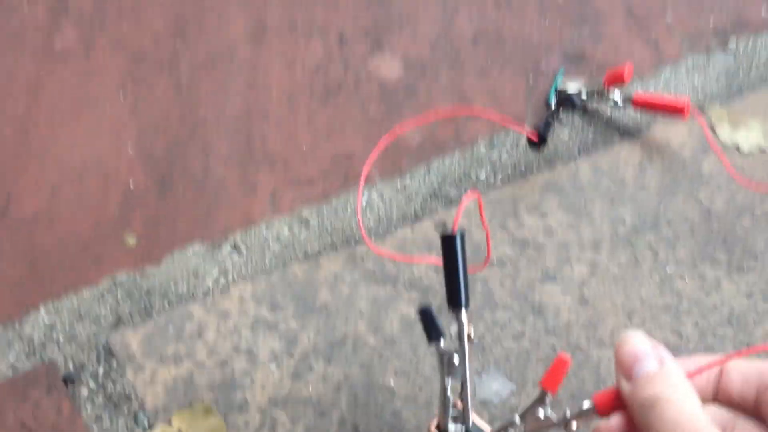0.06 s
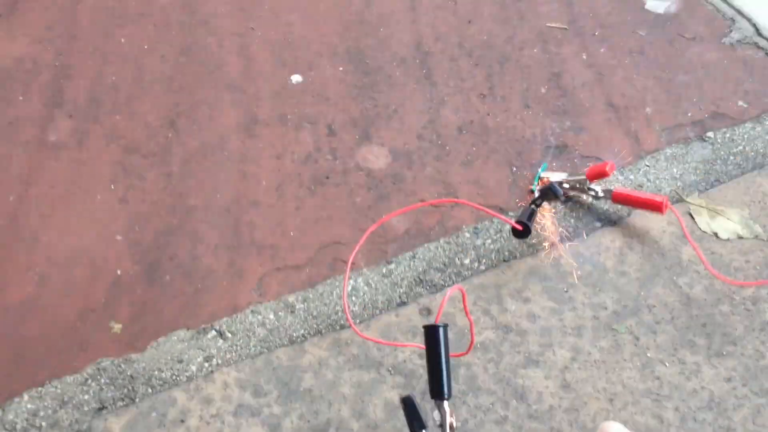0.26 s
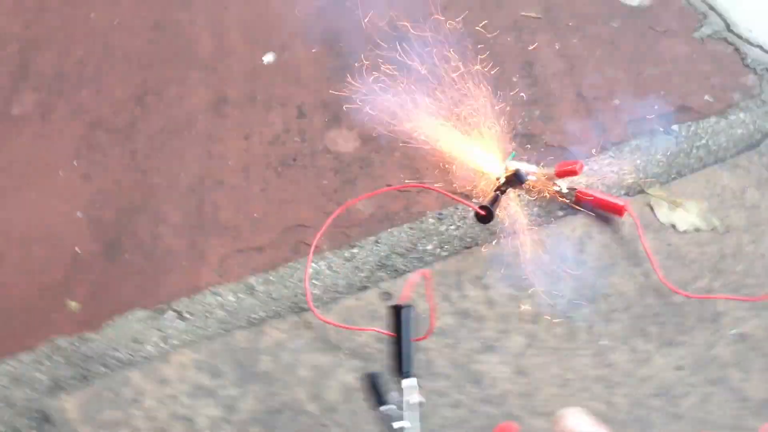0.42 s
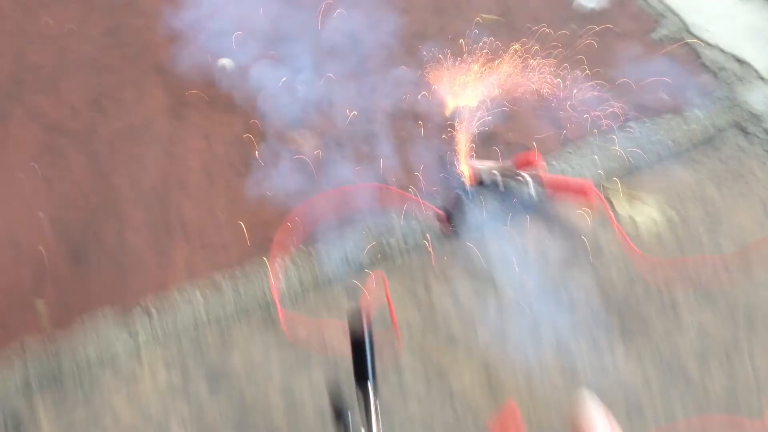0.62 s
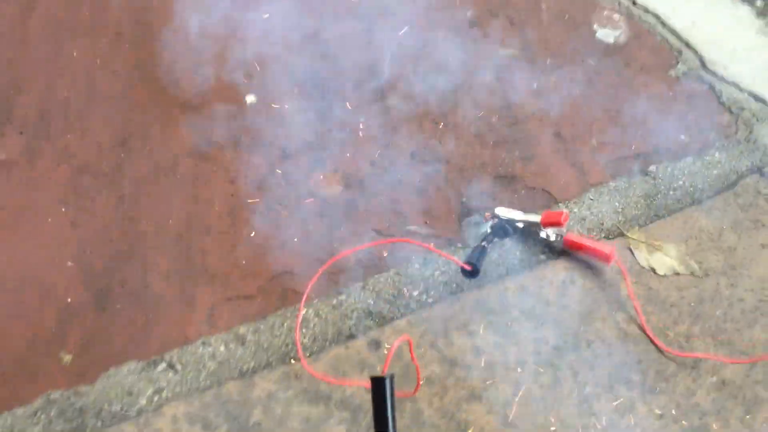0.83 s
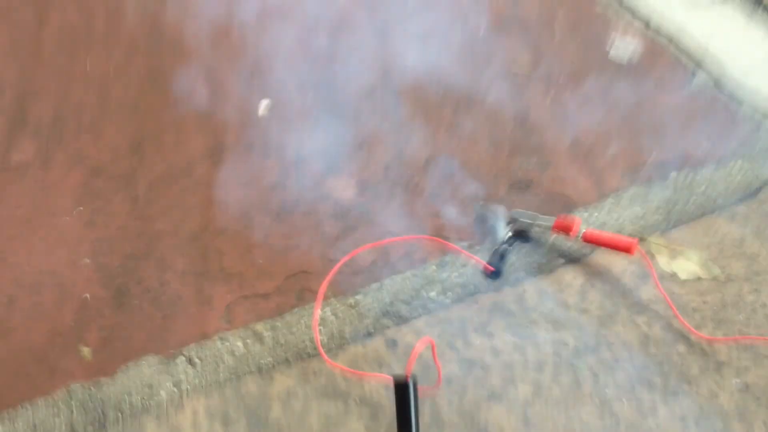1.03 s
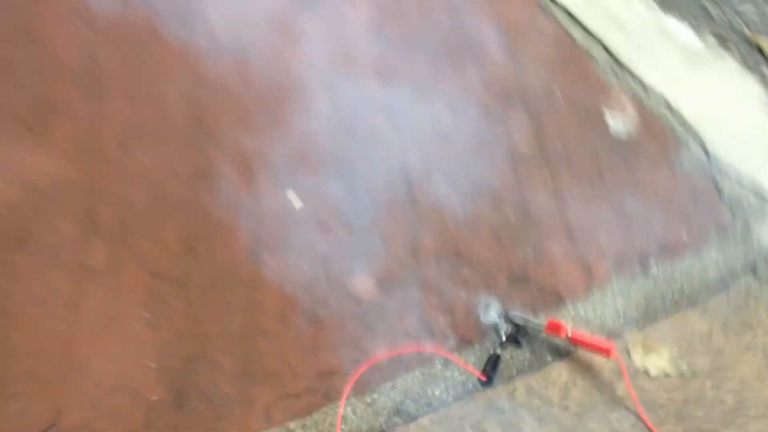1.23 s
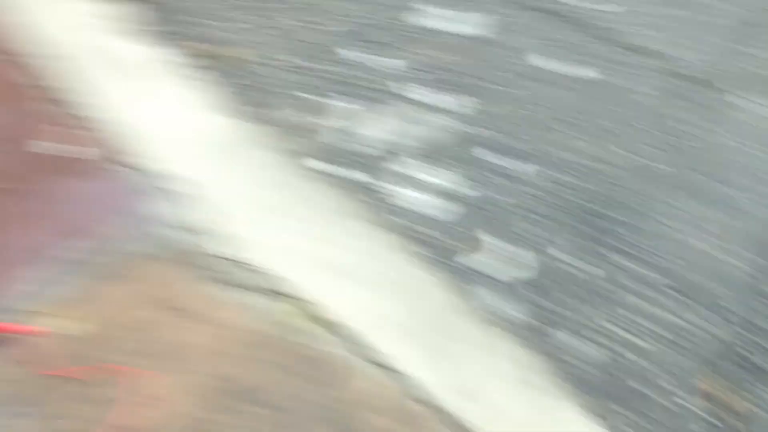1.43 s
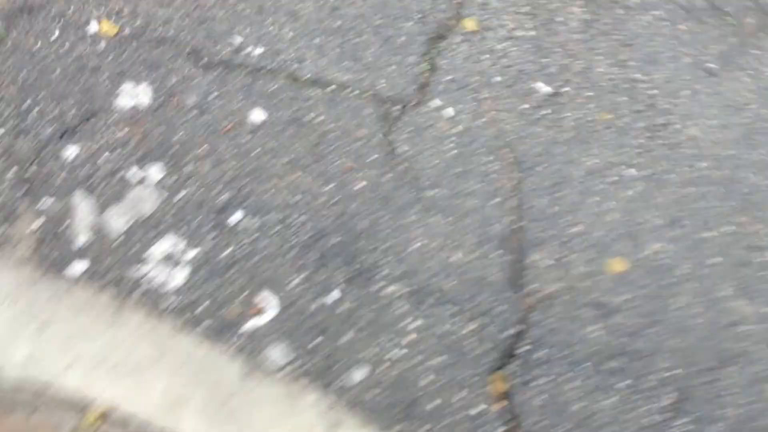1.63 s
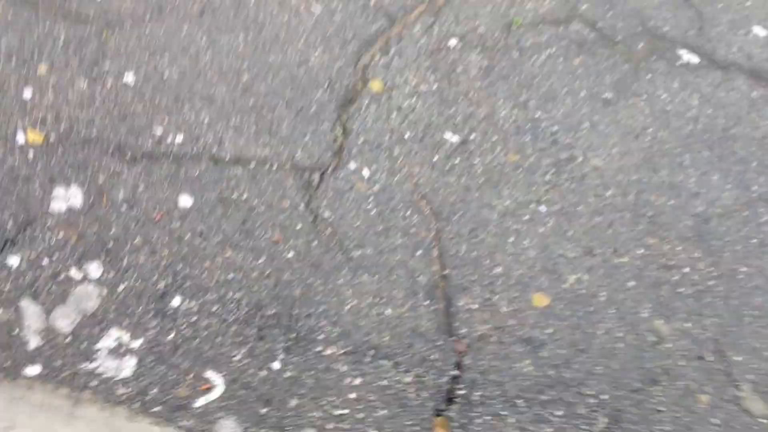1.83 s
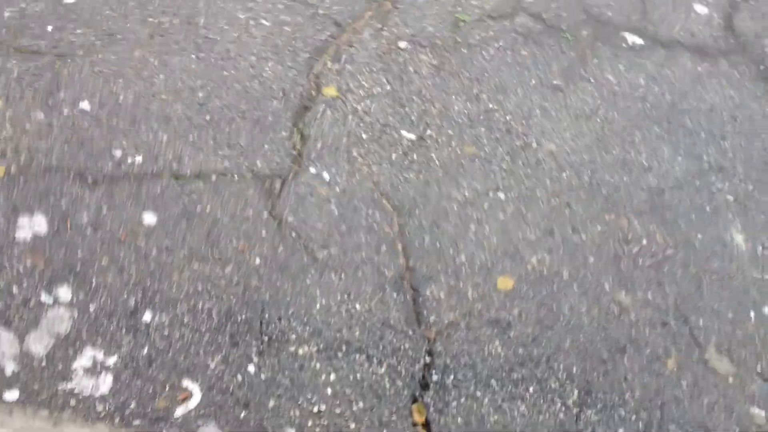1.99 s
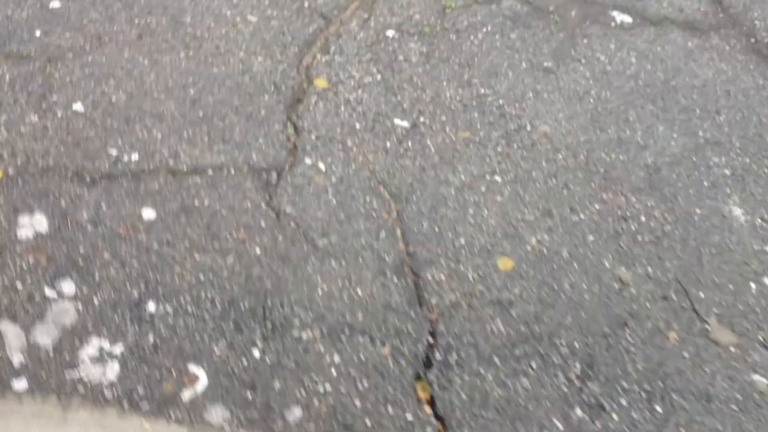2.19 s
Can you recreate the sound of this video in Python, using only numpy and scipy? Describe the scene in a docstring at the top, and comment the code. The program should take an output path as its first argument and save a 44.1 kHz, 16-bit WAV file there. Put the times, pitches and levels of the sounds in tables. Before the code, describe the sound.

A short fuse flares with a hiss, pops sharply and sizzles out outdoors.

```python
"""Over a faint town rumble, a short fuse catches at once, lit electrically on a pavement.
It flares in a fluttering jet of gas and sparks, pops as grains of powder burst, sizzles on more
weakly and goes out. The small microphone close by has a port that rings near 5.7 kHz.
A distant engine hums behind it, and there is one soft bump as the microphone is swung away."""
import sys
import numpy as np
from scipy import signal
from scipy.fft import rfft, irfft
from scipy.io import wavfile
from scipy.ndimage import uniform_filter1d, map_coordinates

SR = 44100
rng = np.random.default_rng(int(sys.argv[2]) if len(sys.argv) > 2 else 0)


def file_out(sig):
    """Save sig as 16-bit WAV at sys.argv[1]."""
    # one column per channel
    cols = np.atleast_2d(sig).T
    # limit, then scale
    lim = np.clip(cols, -1, 1)
    pcm = np.round(lim * 32767).astype(np.int16)
    wavfile.write(sys.argv[1], SR, pcm)


N = 103635
TIME = np.arange(N) / SR

# Fader rides for the burn's bright hiss, treble fizz and low rush.
# Each row: time in seconds, level in dB ahead of the layer's trim.
HISS_RIDE = [(0.216, -33), (0.286, -31), (0.312, -34.5), (0.364, -23), (0.402, -20), (0.408, -22),
             (0.466, -20.5), (0.55, -27), (0.57, -31), (0.58, -30), (0.63, -22), (0.666, -30),
             (0.68, -26.5), (0.75, -27), (0.768, -36.5), (0.81, -29.5), (0.944, -30), (0.988, -39.5),
             (1.04, -35), (1.07, -41.5), (1.16, -40.5), (1.206, -45.5), (1.326, -42.5), (1.336, -34),
             (1.344, -44), (1.504, -32.5), (1.544, -38.5), (1.552, -33.5), (1.58, -41), (1.588, -32),
             (1.602, -39.5), (1.664, -33.5), (1.736, -47), (1.85, -49.5)]
FIZZ_RIDE = [(0.216, -38), (0.274, -36.5), (0.298, -41), (0.392, -25.5), (0.56, -42), (0.628, -39.5),
             (0.658, -45.5), (0.734, -41), (0.796, -46), (0.874, -35.5), (0.992, -53), (1.035, -57),
             (1.085, -49.5), (1.203, -61.5), (1.313, -60), (1.361, -50), (1.505, -51), (1.511, -45.5),
             (1.85, -57)]
RUSH_RIDE = [(0.216, -52.5), (0.32, -51), (0.364, -40), (0.434, -40), (0.456, -35), (0.472, -38.5),
             (0.824, -40), (0.932, -48), (1.04, -49.5), (1.07, -46), (1.188, -51.5), (1.464, -51),
             (1.482, -46.5), (1.578, -55.5), (1.608, -50.5), (1.732, -53.5), (1.85, -71)]
# EQ curves: hiss and fizz have one for the flare and one for the sizzle, the rush keeps one throughout.
# Each row: frequency in Hz, relative level in dB.
FLARE_HISS_EQ = [(1000, -51), (2800, -6), (3500, -23), (4000, -7.5), (4600, -2.5), (5200, 1.5), (5800, 1),
                 (6700, -3), (7600, -0.5), (8400, -5.5), (9500, -38), (12000, -50)]
SIZZLE_HISS_EQ = [(1000, -53), (2600, -32), (3400, -7), (4000, -2.5), (4600, 1), (5300, 1), (6000, 2.5),
                  (7000, -8), (8000, -11), (9200, -12.5), (12000, -45)]
FLARE_FIZZ_EQ = [(3000, -60), (6500, -39), (8300, -16), (9300, -4), (10300, -4.5), (11200, 7), (12400, 7),
                 (13200, 0), (14400, 4), (15500, 2.5)]
SIZZLE_FIZZ_EQ = [(3000, -64), (6500, -14), (8300, -7), (10000, -2.5), (11500, 1.5), (12800, 5.5),
                  (14000, 0.5), (15500, -3)]
RUSH_EQ = [(80, -45), (200, -15), (350, -6), (650, -7.5), (1100, -1.5), (1600, 1), (2100, 4), (2700, -6.5),
           (3300, -11.5), (4500, -19)]
HISS_TRIM_DB, FIZZ_TRIM_DB, RUSH_TRIM_DB = -14.5, -3, -2
IGNITE_S, ATTACK_S, OUT_S, RELEASE_S = 0.2111, 0.0015, 1.856, 0.014
SIZZLE_S, CROSSFADE_S = .77, .03  # the first flare gives way to a thinner sizzle
SPUTTER_HZ, SPUTTER_DB = 27, 0.73

def fuse():
    """The jet sounds as hiss, fizz and rush from ignition until the powder is gone."""
    source = ground_bounce(jet())
    spent = np.clip((TIME - SIZZLE_S) / CROSSFADE_S + .5, 0, 1)
    hiss = leveller((1 - spent) * eq(source, FLARE_HISS_EQ) + spent * eq(source, SIZZLE_HISS_EQ))
    fizz = leveller((1 - spent) * eq(source, FLARE_FIZZ_EQ) + spent * eq(source, SIZZLE_FIZZ_EQ))
    rush = leveller(eq(source, RUSH_EQ))
    burn = (from_db(HISS_TRIM_DB) * fader(HISS_RIDE) * hiss
            + from_db(FIZZ_TRIM_DB) * fader(FIZZ_RIDE) * fizz
            + from_db(RUSH_TRIM_DB) * fader(RUSH_RIDE) * rush)
    attack = np.clip((TIME - IGNITE_S) / ATTACK_S, 0, 1)
    release = np.exp(-np.maximum(TIME - OUT_S, 0) / RELEASE_S)
    sputter = from_db(SPUTTER_DB * drift(SPUTTER_HZ))
    return attack * release * sputter * burn


SPARKS_PER_S, SPARK_SPREAD_DB, SPARK_POWER_SHARE = 1800, 3.5, 0.23

def jet():
    """Escaping gas makes white noise, peppered with the tiny cracks of sparks."""
    gas = rng.standard_normal(N)
    sizes = from_db(SPARK_SPREAD_DB * np.minimum(rng.exponential(1, N), 3.5))
    polarity = rng.choice([-1, 1], N)
    sparks = sizes * polarity * (rng.random(N) < SPARKS_PER_S / SR)
    return np.sqrt(1 - SPARK_POWER_SHARE) * unit_rms(gas) + np.sqrt(SPARK_POWER_SHARE) * unit_rms(sparks)


# The reflection off the paving. Each row: time in seconds, delay in ms, gain from 0 to 1.
PAVING_REFLECTION = [(.21, 0.15, 0.21), (.75, 0.17, 0.15), (.775, .08, 0.3), (.81, 0.14, 0.6),
                     (.86, 0.12, 0.4), (.89, 0.17, 0.62), (.93, 0.2, 0.53), (.97, .228, 0.26),
                     (1.01, 0.26, .35), (1.1, 0.21, 0.01), (1.3, 0.25, .2), (1.39, 0.2, 0),
                     (1.44, 0.37, 0.44), (1.49, .46, 0.2), (1.56, 0.41, 0), (1.62, .7, 0), (1.85, 0.83, 0)]

def ground_bounce(x):
    """The paving adds a close reflection: a comb filter that sweeps as flame and microphone move."""
    times, delay_ms, gain = np.transpose(PAVING_REFLECTION)
    delay_samples = np.interp(TIME, times, delay_ms) * SR / 1000
    reflection = map_coordinates(x, [np.arange(N) - delay_samples], order=3)
    return x + np.interp(TIME, times, gain) * reflection


# Grains of powder that burst. Each row: start in seconds, relative level in dB, high cut in Hz.
POWDER_BURSTS = [(0.214, -31, 12000), (0.3554, -16, 12000), (1.0527, 4.5, 13000), (1.0606, -20, 11000),
                 (1.1143, -11.5, 4200), (1.5887, -43, 9000), (1.669, -20, 7050)]
# The puff and ring of a burst. Each row: frequency in Hz, bandwidth in Hz, gain in dB.
BURST_RESONANCES = [(1130, 420, 4), (1800, 200, -1.5), (5350, 480, 1.5)]
POP_LOW_CUT_HZ, POP_TRIM_DB = 790, -3
SCATTER_T60_S, SCATTER_DB = 0.064, -13

def pops():
    """Each burst is a thin, briefly ringing crack with a small puff and a short scatter off the ground."""
    cracks = np.zeros(N)
    for start_s, db, high_cut_hz in POWDER_BURSTS:
        band = signal.butter(2, [POP_LOW_CUT_HZ, high_cut_hz], "band", fs=SR, output="sos")
        cracks += signal.sosfilt(band, click(start_s, db + POP_TRIM_DB))
    cracks += sum(from_db(db) * resonance(cracks, hz, width_hz) for hz, width_hz, db in BURST_RESONANCES)
    scatter = rng.standard_normal(N) * from_db(-60 * TIME / SCATTER_T60_S)
    tail = signal.fftconvolve(cracks, scatter / np.linalg.norm(scatter))[:N]
    return cracks + from_db(SCATTER_DB) * tail


# The bassy tone of handling noise. Each row: frequency in Hz, relative level in dB.
HANDLING_EQ = [(40, -29), (90, -8), (150, 7), (230, -8), (400, -26), (900, -31), (2000, -60)]
KNOCK_HZ, KNOCK_WIDTH_HZ = 326, 250

def microphone_bump():
    """Swinging the microphone makes a soft swell of handling rumble with a dull knock in it."""
    tap = click(start_s=1.474, db=-3)
    knock = resonance(resonance(tap, KNOCK_HZ, KNOCK_WIDTH_HZ), KNOCK_HZ, 2 * KNOCK_WIDTH_HZ)
    return swell(HANDLING_EQ, peak_s=1.476, width_s=0.054, db=-48) + knock


# The thin tone of the last hiss. Each row: frequency in Hz, relative level in dB.
LAST_HISS_EQ = [(2000, -42), (4500, -10), (6000, 1), (7200, -1), (8300, -3), (9500, -14), (13000, -25)]

def last_hiss():
    """A very faint hiss swells and fades after the flame is out."""
    return swell(LAST_HISS_EQ, peak_s=2.13, width_s=.065, db=-77.5)


# EQ curves for far traffic and airy hiss. Each row: frequency in Hz, relative level in dB.
TRAFFIC_EQ = [(25, -36), (50, -25), (80, -13), (130, -1.5), (200, -0.5), (300, -7), (450, -15.5),
              (700, -19.5), (1500, -49), (3000, -78)]
AIR_EQ = [(100, -35), (350, 0.5), (600, 3), (1100, -2.5), (2000, -4.5), (3200, -15.5), (4500, -17.5),
          (5700, -18.5), (7500, -22.5), (9500, -25.5), (12000, -19), (15000, -22)]
# The tones of a distant engine. Each row: frequency in Hz, level in dB ahead of the fader.
ENGINE_TONES = [(144, -58.5), (218, -64)]
# Fader rides for traffic, air and engine. Each row: time in seconds, gain in dB.
TRAFFIC_RIDE = [(0, -53), (.1, -54.5), (.2, -56), (.8, -52.5), (1.3, -58), (1.8, -59), (2.0, -61),
                (2.12, -60.5), (2.35, -61)]
AIR_RIDE = [(0, -63), (.18, -62.5), (1.85, -62.5), (2.0, -64), (2.1, -62.5), (2.35, -62.5)]
ENGINE_RIDE = [(0, 5.5), (.3, -8), (.65, 0.5), (1.2, -5), (1.9, -3.5), (2.15, -7), (2.35, -19)]
HUM_WANDER_HZ, HUM_WAVER_DB = 1.57, 3

def town():
    """The background bed: far traffic rumble, a faint hiss of air and a wavering engine hum."""
    hum = np.zeros(N)
    for hz, db in ENGINE_TONES:
        gain = from_db(db + HUM_WAVER_DB * drift(rate_hz=3.3))
        pitch_hz = hz + HUM_WANDER_HZ * drift(rate_hz=3.66)
        hum += gain * np.sqrt(2) * np.sin(2 * np.pi * np.cumsum(pitch_hz) / SR)
    traffic = fader(TRAFFIC_RIDE) * eq(rng.standard_normal(N), TRAFFIC_EQ)
    air = fader(AIR_RIDE) * eq(rng.standard_normal(N), AIR_EQ)
    return traffic + air + fader(ENGINE_RIDE) * hum


def from_db(db):
    """Decibels to gain."""
    return 10 ** (np.asarray(db) / 20)


def unit_rms(x):
    """Normalise to rms 1."""
    return x / np.sqrt(np.mean(x ** 2) + 1e-20)


def leveller(x):
    """Hold the short-term level at rms 1."""
    return x / np.sqrt(uniform_filter1d(x * x, size=900) + 1e-12)


def fader(ride):
    """Gain over time, gliding in dB between the points of a ride."""
    return from_db(np.interp(TIME, *np.transpose(ride)))


def eq(x, curve):
    """Shape a signal with an EQ curve, then normalise to rms 1."""
    hz, db = np.transpose(curve)
    bin_hz = np.maximum(np.fft.rfftfreq(N, 1 / SR), 1)
    gain = from_db(np.interp(np.log(bin_hz), np.log(hz), db))
    return unit_rms(irfft(rfft(x) * gain, N))


def drift(rate_hz):
    """Smooth random modulation at rms 1."""
    r = np.exp(-2 * np.pi * rate_hz / SR)
    return unit_rms(signal.lfilter([1], [1, -2 * r, r * r], rng.standard_normal(N + SR))[SR:])


def resonance(x, hz, width_hz):
    """Two-pole band-pass with unity gain at its peak."""
    r = np.exp(-np.pi * width_hz / SR)
    feedback = [1, -2 * r * np.cos(2 * np.pi * hz / SR), r * r]
    return signal.lfilter(np.array([1, 0, -1]) * (1 - r * r) / 2, feedback, x + 1e-18)


def click(start_s, db):
    """A one-sample impulse."""
    return from_db(db) * (np.arange(N) == int(start_s * SR))


def swell(curve, peak_s, width_s, db):
    """Shaped noise that fades in and out on a bell curve."""
    envelope = np.exp(-.5 * ((TIME - peak_s) / width_s) ** 2)
    return from_db(db) * envelope * eq(rng.standard_normal(N), curve)


def scene():
    """The mono mix: fuse and pops up front, then bump, last hiss and town."""
    return (fuse() + pops() + microphone_bump() + last_hiss() + town())[None]


PORT_HZ, PORT_WIDTH_HZ, PORT_DB = 5720, 763, 17.5
HIGH_CUT_HZ = 15200

def record(dry):
    """The microphone port rings, peaks are soft-clipped and a steep filter cuts the top."""
    ringing = dry + from_db(PORT_DB) * resonance(dry, PORT_HZ, PORT_WIDTH_HZ)
    rounded = 0.56 * np.tanh(ringing / 0.63)
    return signal.sosfilt(signal.ellip(12, .1, 80, HIGH_CUT_HZ, fs=SR, output="sos"), rounded)


dry = scene()
out = record(dry)
file_out(out)
```